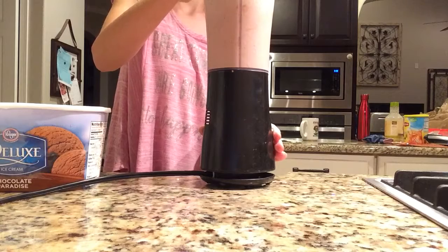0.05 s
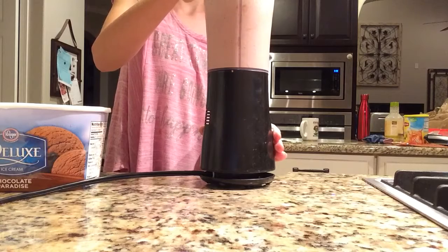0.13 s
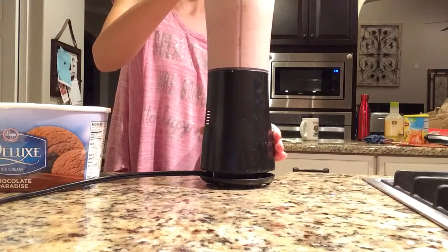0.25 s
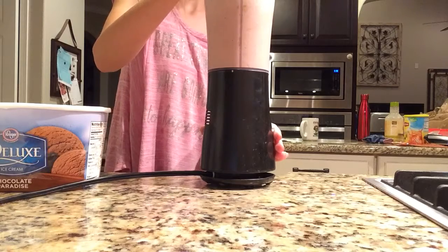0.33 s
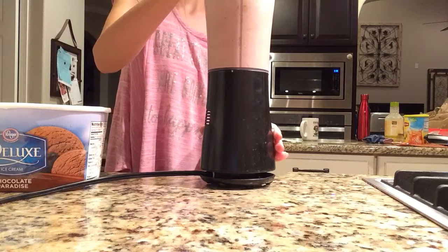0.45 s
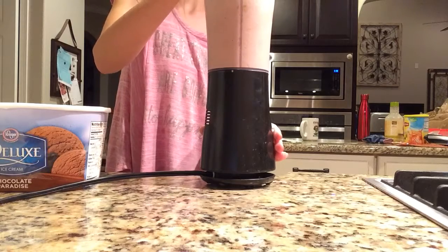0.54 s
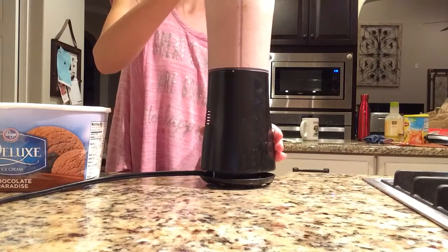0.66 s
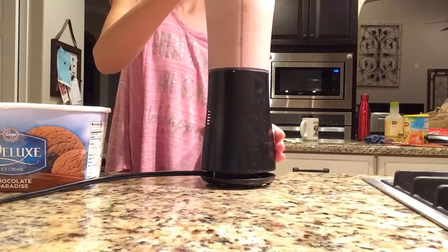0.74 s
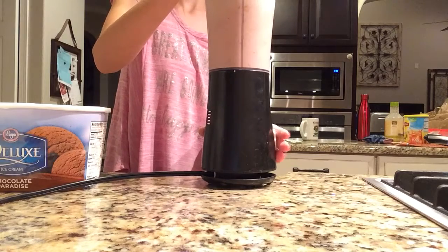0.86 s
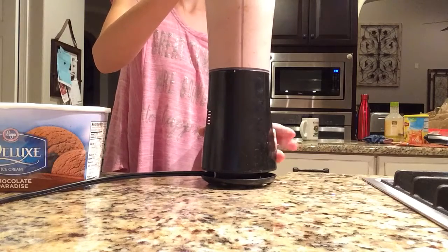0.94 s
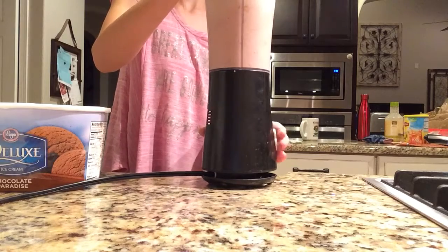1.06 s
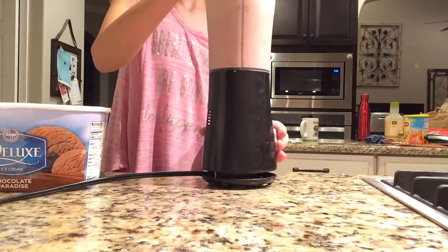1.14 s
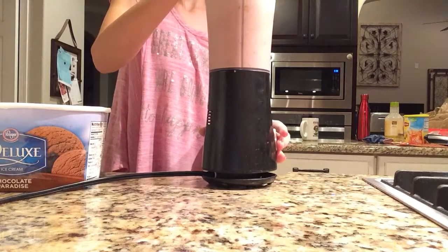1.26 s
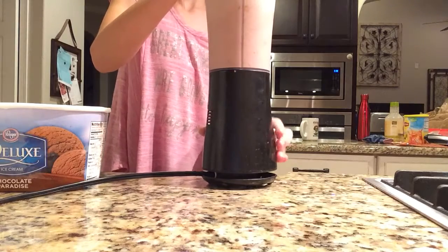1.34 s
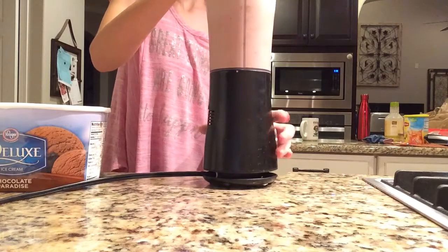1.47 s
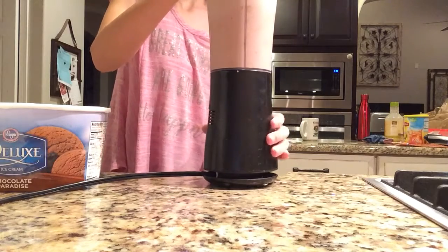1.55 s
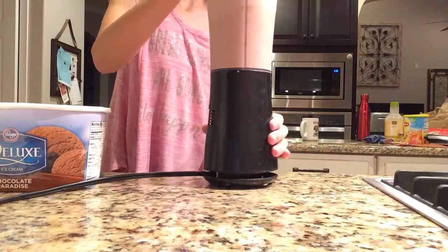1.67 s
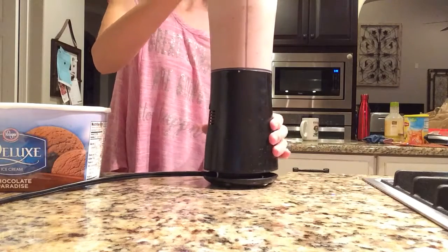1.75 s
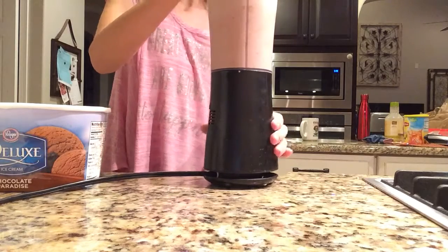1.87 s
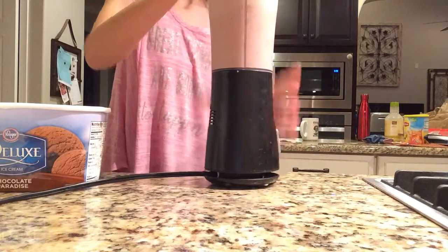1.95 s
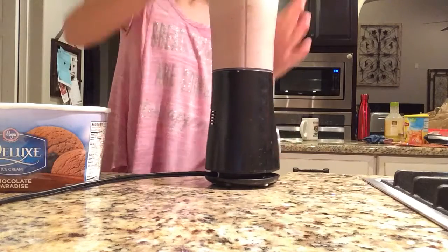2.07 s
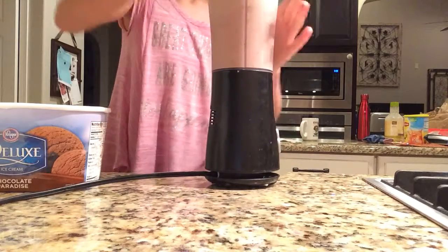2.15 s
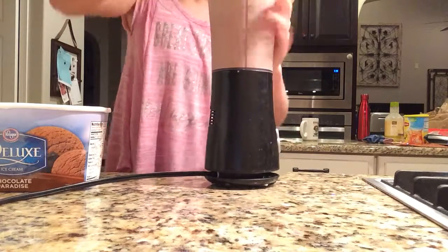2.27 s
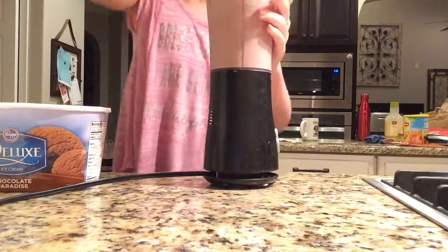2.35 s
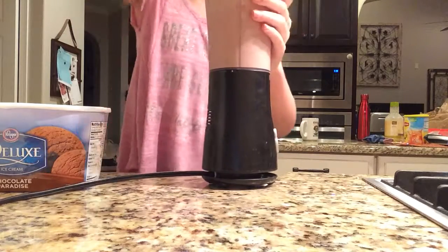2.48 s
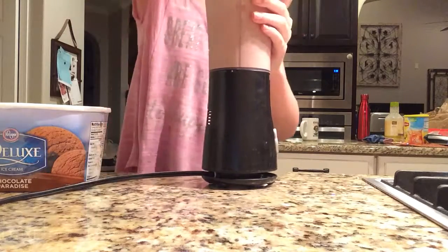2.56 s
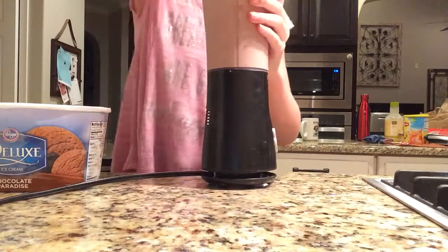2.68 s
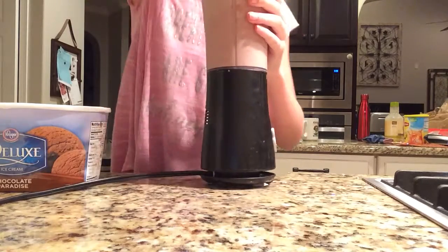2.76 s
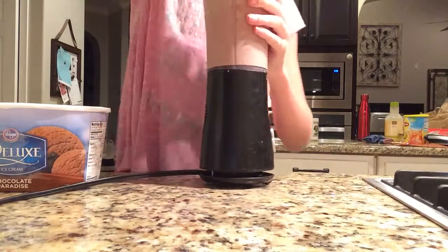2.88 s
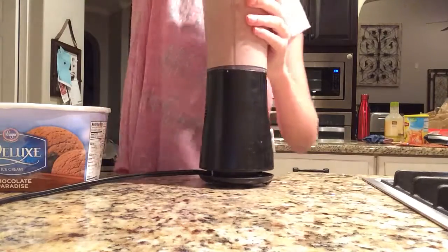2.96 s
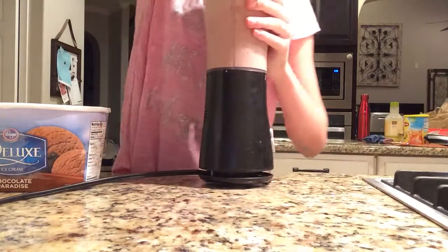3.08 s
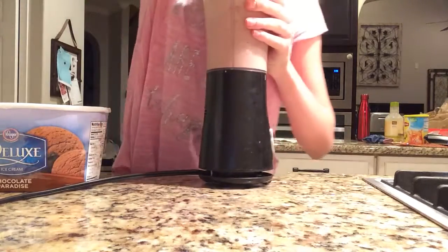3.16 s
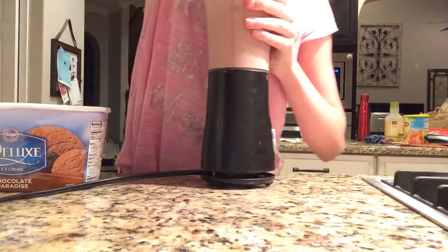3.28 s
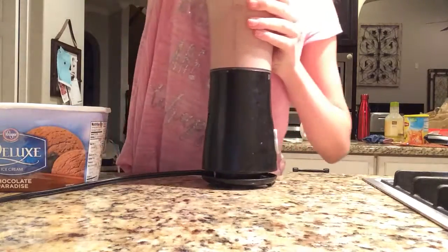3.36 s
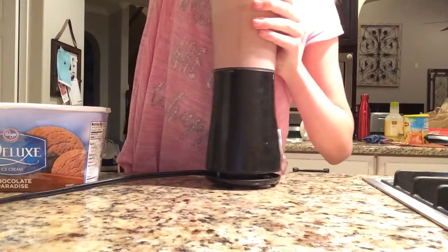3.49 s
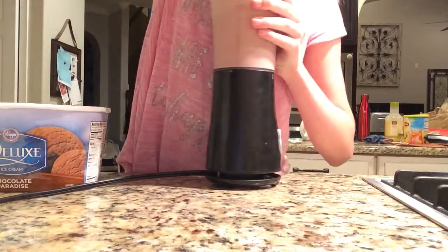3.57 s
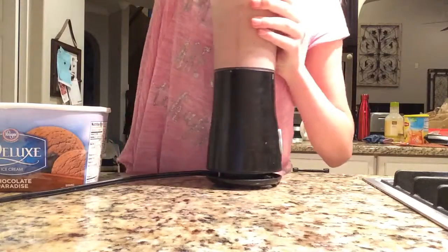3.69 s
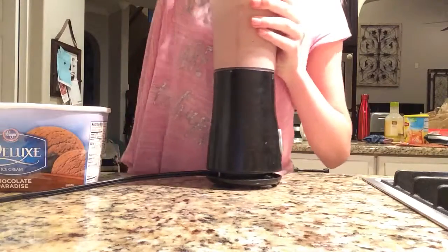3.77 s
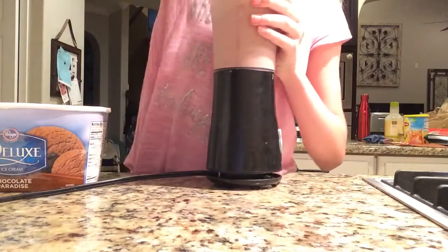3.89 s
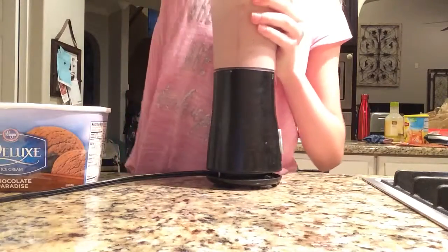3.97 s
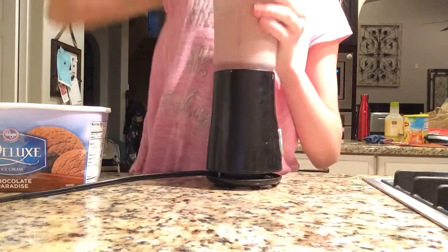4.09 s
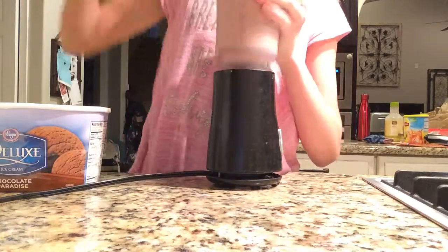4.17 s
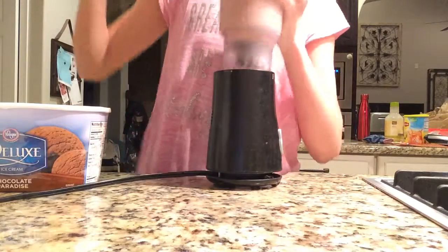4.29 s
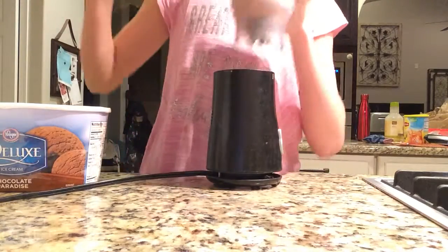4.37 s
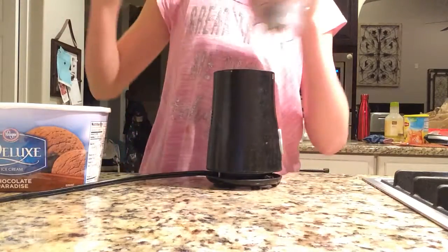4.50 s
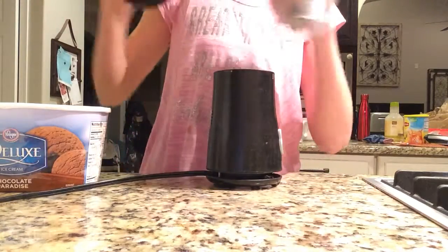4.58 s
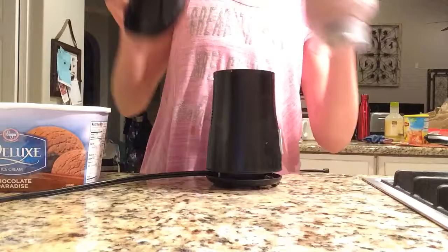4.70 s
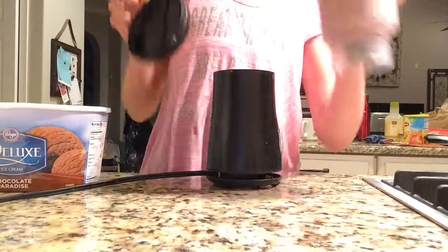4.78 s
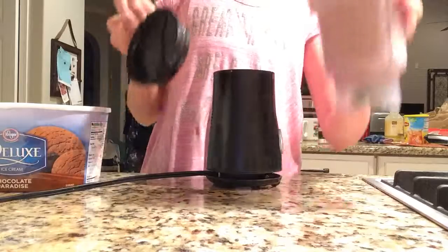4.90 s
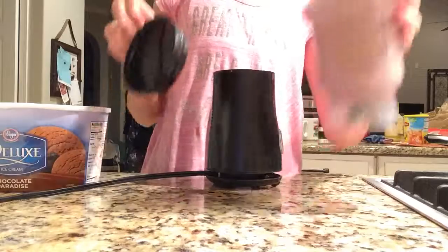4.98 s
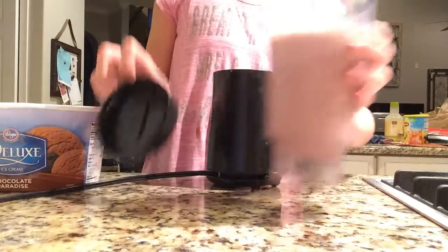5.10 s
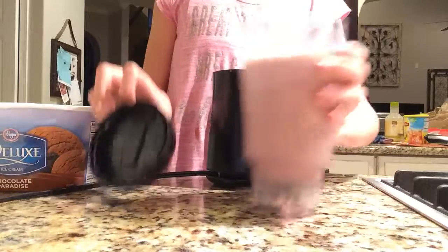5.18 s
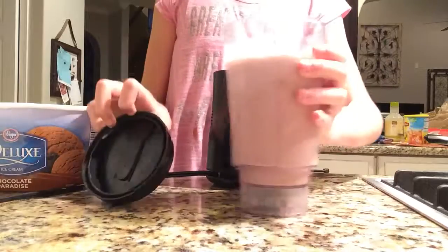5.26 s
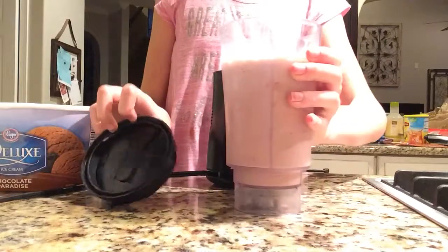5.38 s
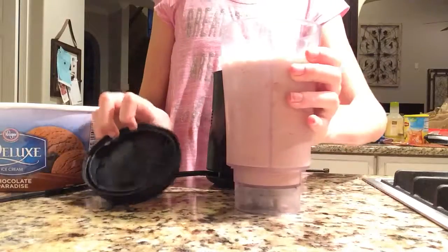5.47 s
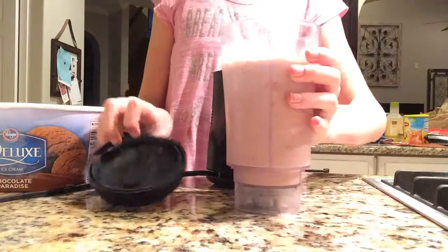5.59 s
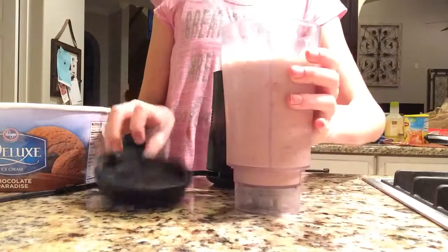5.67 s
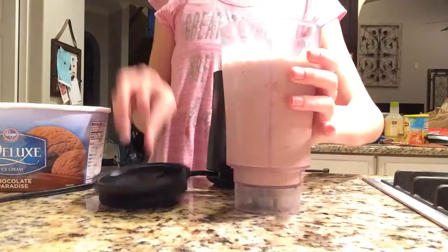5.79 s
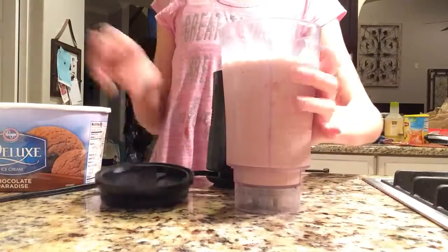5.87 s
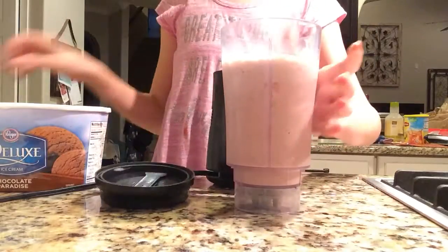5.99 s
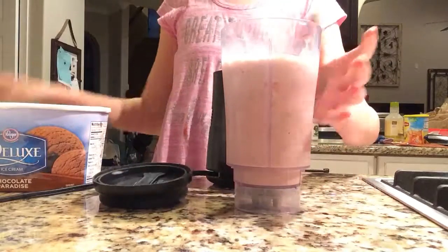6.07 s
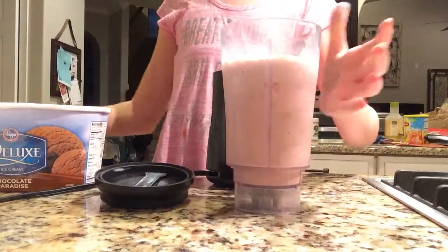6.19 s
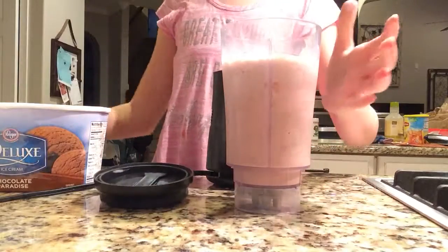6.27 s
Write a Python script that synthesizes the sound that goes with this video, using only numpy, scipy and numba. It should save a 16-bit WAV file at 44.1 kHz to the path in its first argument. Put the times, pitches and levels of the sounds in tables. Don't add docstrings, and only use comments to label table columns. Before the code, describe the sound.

A little electric blender runs briefly, its pitch dipping, then winds down over more than a second with rattling housing and slowing clacks. Rhythmic spoon-like scraping on the cup continues after it stops. Plastic handling follows: a sharp knock, a clunk, quiet lifting rubs, crisp clicks, a full cup thumping on stone and a lid bouncing beside it. Nearby phone pickup in a live kitchen with faint appliance hum.

```python
import sys
import numpy as np
from scipy import signal
from scipy.fft import rfft, irfft
from scipy.io import wavfile
from scipy.ndimage import uniform_filter1d
from numba import njit

SR = 44100
rng = np.random.default_rng(int(sys.argv[2]) if len(sys.argv) > 2 else 0)


def field_ratio(decibels):
    return 10 ** (np.asarray(decibels, dtype=float) / 20)


def store_pcm(level_fs):
    pcm = np.round(np.clip(level_fs, -1, 1) * 32767).astype(np.int16)
    wavfile.write(sys.argv[1], SR, np.atleast_2d(pcm).T)


N = 279594
T = np.arange(N) / SR
OFF_S, LAST_TURN_S = 0.8, 2.1154
RIPPLE_HZ = 120.55
FLUTTER_DB = 4.5
TOP_HZ = 15250
BELLY_DB_PER_S = 186


def unit(x):
    return x / np.sqrt(np.mean(x ** 2))


def steady(x, window_s=0.071):
    return x / np.sqrt(uniform_filter1d(x ** 2, int(window_s * SR)) + 1e-9)


def curves(rows):
    s, *columns = np.transpose(rows)
    return [np.interp(T, s, c) for c in columns]


def slope(points, hz):
    at, db = np.transpose(points)
    return np.interp(np.log(hz), np.log(at), db)


def coloured(points):
    hz = np.maximum(np.arange(N // 2 + 1) * SR / N, 1)
    return unit(irfft(rfft(rng.standard_normal(N)) * field_ratio(slope(points, hz)), N))


def walk(rate):
    k = int(SR / rate)
    held = np.repeat(rng.standard_normal(N // k + 1), k)
    return 1.28 * uniform_filter1d(uniform_filter1d(held, k), k)[:N]


@njit
def svf(x, hz, width):
    y, b, l = np.empty(len(x)), 0., 0.
    for i in range(len(x)):
        g, k = np.tan(np.pi * hz[i] / SR), width / hz[i]
        v = (b + g * (x[i] - l)) / (1 + g * (g + k))
        b, l, y[i] = 2 * v - b, l + 2 * g * v, k * v
    return y


def resonate(x, peaks):
    out = 0
    for k, (hz, width_hz, db) in enumerate(peaks):
        band = svf(x, np.full(N, 1. * hz), 1. * width_hz)
        out = out + (-1) ** k * field_ratio(db) / np.sqrt(width_hz) * band
    return out


def pulses(turns, scatter_db):
    whole = np.arange(np.ceil(turns[0]), min(turns[-1], 1))
    at = np.interp(whole, turns, np.arange(N))
    i = at.astype(int)
    size = field_ratio(scatter_db * rng.standard_normal(len(i))) / np.sqrt(np.gradient(turns)[i])
    out = np.zeros(N)
    out[i] += size * (1 - at + i)
    out[i + 1] += size * (at - i)
    return out


# (t/ms, share)
ECHOES = [(1.3, .18), (2.9, -.22), (4.7, .22), (7.3, .18)]


def nearby(x):
    return unit(x + sum(share * np.roll(x, int(ms * SR / 1000)) for ms, share in ECHOES))


def pressure(start_s, length_s, release):
    press = np.sin(np.pi / 2 * np.clip((T - start_s) / 0.071, 0, 1)) ** 2
    return press * field_ratio(-release * np.maximum(T - start_s - length_s, 0))


# (f/Hz, level/dB)
KITCHEN = [(25, -22.5), (97, 3), (135, -1.5), (165, -16), (215, -8.5), (280, -6), (380, -13.5), (560, -2.5),
           (720, -19.5), (1200, -16), (1450, -23), (2450, -18.5), (6500, -24), (14800, -24.5)]


def kitchen():
    return field_ratio(-47 + 0.87 * walk(6.4)) * nearby(coloured(KITCHEN))


def shaft_turns(hz):
    waver_hz = (.6 + 3 * (T > OFF_S) * (hz / 400) ** 2) * walk(40)
    turns = np.cumsum(uniform_filter1d(hz, 900) + waver_hz) / SR
    return turns - turns[int(LAST_TURN_S * SR)]


# (f/Hz, level/dB)
ORDER_LEVELS = [
    [(70, -64), (118, -44), (150, -48.5), (190, -42), (208, -30.5), (226, -32.5), (240, -42.5), (270, -50),
     (300, -42), (320, -35), (350, -25.5), (375, -25), (408, -19)],
    [(150, -51.5), (250, -42), (310, -39.5), (370, -56), (420, -41.5), (455, -42), (510, -37), (570, -46),
     (620, -56), (690, -33.5), (750, -31), (780, -32), (800, -36), (815, -38)],
    [(230, -63), (400, -48), (530, -36), (600, -53), (700, -41), (800, -43), (880, -45), (950, -35),
     (1030, -43), (1115, -49), (1140, -30.5), (1170, -26.5), (1222, -23)],
    [(310, -55.5), (500, -47.5), (680, -42.5), (800, -53.5), (1060, -48), (1270, -41.5), (1490, -60),
     (1560, -38), (1600, -50), (1630, -31)],
    [(400, -77), (1500, -55), (1650, -34.5), (1720, -45), (1810, -26.5), (1870, -36), (1935, -44),
     (1965, -48), (2000, -31), (2038, -40)],
    [(500, -75), (1700, -51.5), (1910, -38), (2100, -48), (2250, -31.5), (2350, -29.5), (2400, -39),
     (2445, -36.5)],
]


def shaft_orders(turns, hz, powered):
    out = 0
    for k, body in enumerate(ORDER_LEVELS):
        waver_db = 0.5 + (0.84 - 0.47 * powered) * k + FLUTTER_DB * 0.44 * (1.5 - powered)
        level_db = slope(body, (k + 1) * hz) + 2.0 + waver_db * walk(32.05)
        out = out + field_ratio(level_db) * np.sin(2 * np.pi * (k + 1) * turns + k * k)
    return out


# (shaft order, ripple multiple before rounding to a whole one,
# level/dB)
BEATS = [(1, 1.5, -45), (2, 1, -38.5), (3, 0.5, -53), (4, 2, -56), (5, 0, -51), (5, 1, -42.5),
         (6, -1.5, -44), (6, 1.5, -35.5), (7, 1.5, -55), (7, 1, -58), (8, -0.5, -42), (8, 1, -52),
         (9, 0, -62), (10, 1, -37.5), (11, -2, -55), (12, -3, -53), (12, 0, -56), (13, -1.5, -57),
         (15, 3, -65), (6, 3.5, -54), (10, 3, -54), (13, -0.5, -51), (12, 1, -56), (12, 3.5, -58),
         (14, 0, -57), (13, 2, -64), (14, 2.5, -63), (16, -1.5, -59), (5, 3, -56)]
# (f/Hz, level/dB)
BEAT_BODY = [(500, -7), (1250, -1.5), (1350, -1), (2420, 1.5), (2580, -11.5), (2900, -9), (3100, -5),
             (4700, -10), (4850, -9), (5100, 4.5)]


def mains_beats(turns, hz):
    on = slice(0, SR)
    out = 0
    for k, side, db in BEATS:
        order, shift_hz = int(k), round(side) * RIPPLE_HZ
        body_db = slope(BEAT_BODY, order * hz[on] + shift_hz)
        waver_db = 2.5 * (1 + k / 12) * walk(16.4)[on]
        phase = 2 * np.pi * (order * turns[on] + shift_hz * T[on])
        out = out + field_ratio(db + 2.5 + body_db + waver_db) * np.sin(phase)
    return np.pad(out, (0, N - SR))


# (f/Hz, level/dB)
SPARK = [(2400, -60), (3500, -55), (5200, -58), (6600, -62), (9000, -64.5), (13000, -71)]


def sparks(turns, hz):
    n = int((OFF_S + .1) * SR)
    out = np.zeros(N)
    for k in range(6, 34):
        body = slope(SPARK, k * hz[:n])
        wavers = walk(20)[:7 * n].reshape(7, n)
        for side, waver, chance in zip(range(-3, 4), wavers, rng.standard_normal((7, 2))):
            phase = 2 * np.pi * (k * turns[:n] + side * RIPPLE_HZ * T[:n] + chance[1])
            out[:n] += field_ratio(body + 4 * waver + 3.5 * chance[0]) * np.sin(phase)
    return out


# (f/Hz, width/Hz, level/dB)
HOUSING = [(556, 64, 6.5), (1345, 90, 3), (1934, 41, 10), (2210, 310, 10), (2407, 13, 5)]
BEARING = [(4480, 640, 3), (5070, 110, 2.5), (5600, 890, -7.5), (7050, 890, 0)]
SHELL = [(3060, 1100, 4), (4200, 630, -1)]
# (f/Hz, level/dB)
RATTLE = [(60, -50), (78, -44.5), (120, -50), (165, -55), (220, -50.5), (300, -40.5), (400, -32)]


def housing_rattle(turns, hz, powered, knock):
    grind = unit(np.exp(-(turns % 1) / 0.3) * rng.standard_normal(N))
    housing = steady(resonate(knock + (.55 - 0.39 * hz / 400) * grind, HOUSING), window_s=0.69)
    bearing = steady(resonate(knock * 0.18 * (1.1 - hz / 420) + 2.9 * grind, BEARING))
    shell = (hz / 400) ** 2 * steady(resonate(.3 * knock + 1.4 * grind, SHELL))
    flare_db = 6.5 * np.exp(-((T - 0.439) / 0.022) ** 2)
    flutter_db = FLUTTER_DB * (1 - powered) * (hz / 400) * walk(24.74)
    level = field_ratio(slope(RATTLE, hz) + flare_db + 4.0 + flutter_db)
    return level * (housing + field_ratio(-5.0 - 6 * hz / 400) * bearing + field_ratio(-9.5) * shell)


# (f/Hz, level/dB)
BRUSH = [(2500, -4), (2800, -8), (3100, 4), (3400, 1), (3600, -7), (3800, -4), (3900, -5), (4000, -16),
         (4060, -30), (4200, -14), (4600, -4), (5200, 4), (5700, -3), (6200, -1), (6700, -8), (7200, 3),
         (8000, -2), (8800, -1), (9800, -16), (11500, -16), (12400, 1), (13800, 0), (15300, -6)]


def brush_whine(turns, hz, powered):
    bars, out = 10, 0
    for k in bars * np.arange(1, 10):
        db = slope(BRUSH, k * hz) - 5 * powered * (k > bars) + 8 * powered * (k == bars)
        db = db - 8 * (k == 3 * bars) * (k * hz < 6800) + 3.5 * walk(30)
        out = out + (k * hz < TOP_HZ) * field_ratio(db) * np.sin(2 * np.pi * k * turns)
    return field_ratio(-8 - 4 * powered) * np.clip(hz / 90 - 1, 0, 1) * out


# (f/Hz, level/dB)
FAN = [(1470, -7.5), (2500, 4.5), (2740, -19), (3110, 0.5), (5150, -1), (6490, -4.5), (8010, 0.5),
       (10400, -2), (14600, -1), (15600, -5), (16000, -37)]


def fan_hiss():
    return nearby(coloured(FAN)) * field_ratio(.8 * walk(25))


# (f/Hz, level/dB)
CHURN = [(250, -30), (400, -2), (600, 2), (900, -7.5), (1300, -11), (1480, -14), (1800, -1.5),
         (2500, -13.5), (3200, -19), (6000, -60)]
RUMBLE = [(25, 1), (50, -36), (100, 4.5), (170, -13), (260, 1), (400, -15.5), (800, -49)]
# (f/Hz, level/dB)
CHURN_SPEED = [(60, -46.5), (110, -42), (165, -51), (230, -46), (310, -39.5), (375, -42.5), (408, -41)]


def drink_and_counter(hz):
    stir = sum(field_ratio(db) * pressure(s, length, BELLY_DB_PER_S) for s, length, db, *_ in STROKES)
    churn = field_ratio(slope(CHURN_SPEED, hz)) + field_ratio(-6.5) * stir
    shudder = field_ratio(-33.5) * np.exp(-((T - 1.105) / 0.083) ** 2)
    rumble = field_ratio(-47.5) + field_ratio(3.5) * stir + shudder
    drink = field_ratio(4) * churn * coloured(CHURN) * field_ratio(1.2 * walk(20))
    return drink + field_ratio(-8.5) * rumble * coloured(RUMBLE)


# (f/Hz, width/Hz, level/dB)
CLACK = [(1250, 237, -3), (2004, 180, 4.5), (2296, 220, 3.5), (4600, 450, -6.5), (5840, 500, -10),
         (6840, 830, -24)]
# (f/Hz, level/dB)
CLACK_SPEED = [(60, -39.5), (90, -37), (125, -42.5), (170, -53)]


def coupling_clack(hz, knock):
    return field_ratio(slope(CLACK_SPEED, hz)) * steady(resonate(knock, CLACK), window_s=0.25)


# (t/s, f/Hz)
SHAFT = [(0.0, 407.6), (0.2, 408), (0.36, 405.5), (0.4, 398.1), (0.48, 375.6), (0.53, 371.3), (0.66, 382.5),
         (0.785, 391.5), (0.82, 379), (0.92, 334.9), (1.15, 271.9), (1.36, 221.0), (1.51, 185.5),
         (1.67, 151.5), (1.8, 122.3), (1.88, 105.5), (1.97, 86.7), (2.1, 59.5)]


def motor():
    hz, = curves(SHAFT)
    turns = shaft_turns(hz)
    running = np.clip((LAST_TURN_S + 0.07 - T) / 0.031, 0, 1)
    powered = np.clip((OFF_S + 0.07 - T) / 0.051, 0, 1)
    turning = T < LAST_TURN_S + .018
    knock = pulses(turns - 1e-6, scatter_db=1.4)
    air_db = -38 + 6 * np.log2(hz / hz.max()) + 2.0
    air = field_ratio(air_db) * (brush_whine(turns, hz, powered) + fan_hiss())
    smooth = running * (shaft_orders(turns, hz, powered) + air + drink_and_counter(hz))
    electric = powered * (mains_beats(turns, hz) + sparks(turns, hz))
    loose = housing_rattle(turns, hz, powered, knock) + coupling_clack(hz, knock)
    return smooth + electric + turning * loose


# (t/s, length/s, wall level/dB, belly minus wall level/dB, wall resonance f/Hz)
STROKES = [
    (0.326, 0.097, -38, -4, 1050),
    (0.773, 0.084, -36, -6, 970),
    (1.25, 0.097, -40, 4.5, 1000),
    (1.711, 0.11, -38.5, 2, 1060),
    (2.174, .12, -33, -1, 1008),
    (2.652, 0.11, -31.5, -4.5, 1090),
    (3.123, 0.066, -34, 1.5, 1300),
    (3.17, 0.062, -34, 0.5, 1310),
]
# (f/Hz, width/Hz, level/dB)
BELLY = [(126, 72, 8.1), (271, 24, 13.2), (490, 410, 1.9)]
WALL = [(725, 440, 26.5), (1343, 26, 23), (1510, 160, 14.5), (2400, 500, -42), (3110, 180, 14)]


def spoon():
    slips = (rng.random(N) < 2500 / SR) * field_ratio(2.2 * rng.exponential(size=N)) * rng.standard_normal(N)
    slips = slips * field_ratio(3.5 * walk(40.1)) + 0.55 * rng.standard_normal(N)
    belly = unit(resonate(slips, BELLY))
    wall = unit(resonate(uniform_filter1d(slips, size=3), WALL))
    deep = unit(resonate(slips, [(730, 70, 0)]))
    out = 0
    for s, length, db, belly_db, wall_hz in STROKES:
        hz = np.full(N, 1. * wall_hz)
        scrape = unit(svf(svf(slips, hz, 280.0), hz, 280.0))
        depth = np.clip((1082 - wall_hz) / 110, 0, 1)
        touch = pressure(s, length, 385)
        out = out + touch * field_ratio(db) * (0.68 * scrape + 0.5 * wall + depth * deep)
        out = out + pressure(s, length, BELLY_DB_PER_S) * field_ratio(db + belly_db) * belly
    return out


def ring(push, modes):
    t = np.arange(len(push)) / SR
    detune = 1 + .03 * rng.standard_normal(len(modes))
    body = 0
    for k, (hz, db, t60) in enumerate(modes):
        decay = 1000. ** (-t / np.clip(t60, .001, .12))
        body = body + (-1) ** k * field_ratio(db) * np.sin(2 * np.pi * hz * detune[k] * t) * decay
    low_cut = signal.butter(2, .55 * modes[0][0], "high", fs=SR, output="sos")
    y = signal.fftconvolve(push, signal.sosfilt(low_cut, body))[:len(push)]
    return y / np.abs(y).max()


# (f/Hz, level/dB, ring/s)
CRACK = [(1580, 0, 0.00087), (2680, 0, 0.0025), (5230, 0, 0.0015)]


def blows(events, low, mid, high, rough, crack_db):
    out, t = np.zeros(N + SR), np.arange(SR // 4) / SR
    for s, low_db, mid_db, high_db, contact_s in events:
        fade = 10.0 ** (-t / max(contact_s, .001)) * np.minimum(t / 0.00093, 1)
        push = rough * rng.standard_normal(len(t)) * fade
        push[0] = 1
        thump = 0.55 * push + (t == 0)
        sound = field_ratio(high_db + crack_db) * ring(push, CRACK) + field_ratio(low_db + 7.5) * ring(thump, low)
        sound += field_ratio(mid_db + 6.5) * ring(push, mid) + field_ratio(high_db + 13.5) * ring(push, high)
        i = int((s + 0.001015) * SR)
        out[i:i + len(t)] += sound
    return out[:N]


# t/s, level/dB below 900 Hz, level/dB 1-4 kHz, level/dB above 4 kHz, contact/s
TICKS = [
    (2.1365, -46, -30.5, -41.5, 0.003),
    (2.178, -40, -34, -46, 0.0085),
]
# (f/Hz, level/dB, ring/s)
BASE_LOW = [(104, -2, 0.074), (209, -6, 0.067), (302.6, -4.5, 0.2), (470, 7.5, 0.015), (649, 6, 0.026),
            (964, -0.5, 0.022)]
ROTOR_MID = [(1300, 0.88, 0.033), (1885, 11, 0.013), (2110, 8.4, 0.026), (2290, 8.1, 0.019)]
ROTOR_HIGH = [(4230, -6, 0.015), (5200, 3, 0.01)]


def rotor_ticks():
    return blows(TICKS, BASE_LOW, ROTOR_MID, ROTOR_HIGH, rough=0.13, crack_db=-5)


KNOCKS = [
    (3.104, -39.5, -46, -56, 0.041),
    (3.211, -13, -29, -25, 0.006),
    (3.221, -26, -30, -39, 0.011),
    (3.299, -47, -56, -63, 0.013),
]
# (f/Hz, level/dB, ring/s)
BASE_MID = [(1144, 2.5, 0.065), (1360, 5, 0.02), (1770, 5, 0.016), (2560, 1, 0.02), (3240, -4, 0.025)]
KNOCK_HIGH = [(3930, -1, 0.0024), (5100, 9.5, 0.0048), (6560, 3, 0.0047), (8530, 2, 0.0066),
              (10400, 3.5, 0.0021), (13200, 2, 0.0017)]


def cup_knocks():
    return blows(KNOCKS, BASE_LOW, BASE_MID, KNOCK_HIGH, rough=0.11, crack_db=-15.0)


TWIST = [
    (3.417, -25, -50, -47, 0.0053),
    (3.424, -22.5, -40.5, -36.5, 0.022),
    (3.446, -30.5, -49, -58, 0.028),
]
# (f/Hz, level/dB, ring/s)
TWIST_LOW = [(111, -1.5, 0.049), (218, -3, 0.022), (324, 1, 0.032), (446, -2.5, 0.015), (634, -7.5, 0.08)]


def cup_twist():
    return blows(TWIST, TWIST_LOW, BASE_MID, KNOCK_HIGH, rough=0.11, crack_db=10.0)


LIFT = [
    (4.208, -40.5, -46, -51.5, 0.0097),
    (4.301, -31, -33.5, -46, 0.032),
    (4.311, -52, -34.5, -57, 0.036),
    (4.322, -35.5, -50, -48.5, 0.053),
]
# (f/Hz, level/dB, ring/s)
LIFT_MID = [(1050, 3.5, 0.015), (1290, 0, 0.022), (1683, -2, 0.025), (2570, -4, 0.007), (3400, -4, 0.007)]


def cup_lift():
    return blows(LIFT, BASE_LOW, LIFT_MID, KNOCK_HIGH, rough=0.12, crack_db=9)


SNAPS = [(4.4693, -53, -48, -43.5, 0.041), (4.5004, -59, -44.5, -68, 0.033), (4.7725, -76, -56, -50, 0.031),
         (4.794, -72, -54, -23.5, 0.039), (4.805, -72, -59, -41, 0.094), (4.9464, -72, -62, -50.5, 0.099),
         (5.3275, -70, -42, -42, 0.031), (5.4123, -70, -29, -33.5, 0.029), (5.5183, -68, -35.5, -43, 0.032),
         (5.334, -70, -50, -44, 0.03)]
# (f/Hz, level/dB, ring/s)
SNAP_MID = [(1470, 8, 0.0015), (2620, -4.5, 0.014), (3520, 1, 0.0022)]
SNAP_HIGH = [(4930, 4, 0.0022), (5300, -13, 0.0058), (6000, 20, 0.0037), (6300, -13, 0.025),
             (7600, -17, .003), (7540, 24, 0.0022), (10500, 30, 0.00079), (12000, 0, 0.0015),
             (13700, 8, 0.0015), (15400, 14, 0.0023)]


def lid_snaps():
    return blows(SNAPS, BASE_LOW, SNAP_MID, SNAP_HIGH, rough=0.23, crack_db=3.0)


CUP_DOWN = [(5.282, -51, -59, -64, 0.011), (5.2885, -32, -37, -57, 0.0078), (5.3015, -21, -23, -40, 0.0086),
            (5.3135, -18.5, -36, -46, 0.015), (5.3265, -40, -26.5, -51, 0.022),
            (5.3325, -30, -30.5, -51, 0.011), (5.347, -29, -30, -38.5, 0.013),
            (5.359, -31, -57, -58, 0.011), (5.374, -34, -59, -60, 0.0084), (5.414, -30.5, -50, -56, 0.032),
            (5.4205, -23.5, -51, -62, 0.017), (5.519, -43, -63, -67, 0.04)]
THUD = [
    (5.2926, -8, -20.5, -41, 0.016),
]
# (f/Hz, level/dB, ring/s)
CUP_LOW = [(66, -4, 0.088), (93, -2.5, 0.15), (144, -6, 0.07), (198, -1.5, 0.1), (282, -3, 0.055),
           (385, 5.5, 0.062), (467, 12.5, 0.0072), (536, -4.5, 0.025), (633, 5.5, 0.025), (800, 0, 0.027),
           (904, 1, 0.016), (1050, -3, 0.011)]
CUP_MID = [(1120, 2, 0.013), (1740, 1, 0.027), (2070, 4.3, 0.0041), (2680, 1, 0.014), (3300, 5.8, 0.008),
           (4530, 6.8, 0.0067)]
THUD_LOW = [(90.3, -6, 0.14), (396, -0.5, 0.11), (195, -9, 0.09), (483, 0.5, 0.022), (272, -9, 0.062),
            (604, -8, 0.025), (141, -12, .08)]


def cup_down():
    thud = blows(THUD, THUD_LOW, CUP_MID, KNOCK_HIGH, rough=0.1, crack_db=9)
    return thud - blows(CUP_DOWN, CUP_LOW, CUP_MID, KNOCK_HIGH, rough=0.27, crack_db=12)


LID = [(5.7513, -36, -17, -26, 0.014), (5.767, -49, -33, -51, 0.018), (5.7748, -41, -25, -54, 0.022),
       (5.7843, -45, -30, -31, 0.011), (5.7994, -47, -27.5, -60, 0.016), (5.812, -47, -42, -65, 0.023),
       (5.8606, -57, -54, -44.5, 0.012), (5.882, -48, -30, -61, 0.0096), (5.9329, -89, -48, -55, 0.0068),
       (6.0067, -69, -45.5, -53, 0.0083), (6.1674, -68, -50, -56, 0.01)]
# (f/Hz, level/dB, ring/s)
LID_MID = [(753, 0, 0.013), (1180, 0, 0.019), (1500, 7, 0.0081), (1650, 4, 0.03), (1790, 3.5, 0.025),
           (2250, 1.5, 0.009), (2810, 2.5, 0.008), (3700, -6, 0.0074)]
LID_HIGH = [(4440, 0, 0.0037), (5440, 0.5, 0.0037), (6460, -7, 0.005), (7240, -7, 0.0087),
            (8840, -1.5, 0.0022), (10040, -2.5, 0.002), (12700, -6, 0.0025)]


def lid_rattle():
    return blows(LID, BASE_LOW, LID_MID, LID_HIGH, rough=0.14, crack_db=-12)


def room(x):
    t = np.arange(SR // 2) / SR
    tail = rng.standard_normal(len(t)) * 1000. ** (-t / 0.5) * (t > .006)
    tail = signal.lfilter([1], [1, -.2], tail)
    return x + field_ratio(-14.5) * signal.fftconvolve(x, tail / np.sqrt(np.sum(tail ** 2)))[:N]


def scene():
    handling = rotor_ticks() + cup_knocks() + cup_twist() + cup_lift()
    handling += lid_snaps() + cup_down() + lid_rattle()
    return (motor() + room(spoon() + handling) + kitchen())[None]


def low_pass(x):
    return signal.sosfilt(signal.butter(12, 16130, fs=SR, output="sos"), x)


# (f/Hz, width/Hz, share)
NOTCHES = [
    (6600, 520, 0.35),
    (10650, 310, 0.23),
    (13800, 610, 0.73),
]


def record(dry):
    dry = signal.sosfilt(signal.butter(2, 40, "high", fs=SR, output="sos"), dry)
    for hz, width_hz, share in NOTCHES:
        dry = dry - share * svf(dry[0], np.full(N, 1. * hz), 1. * width_hz)
    cut = signal.sosfilt(signal.ellip(12, .2, 70, TOP_HZ, fs=SR, output="sos"), dry)
    return low_pass(cut + field_ratio(-46) * dry)


dry = scene()
out = record(dry)
store_pcm(out)
```